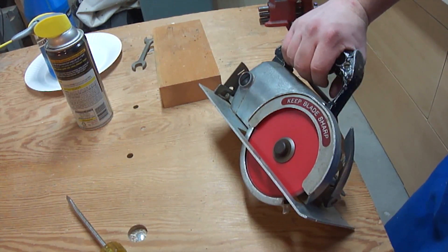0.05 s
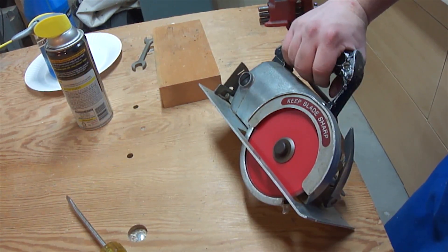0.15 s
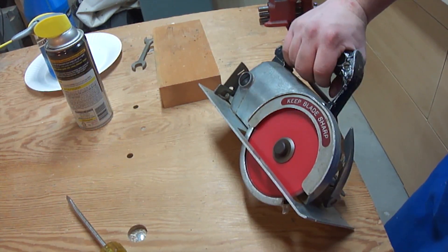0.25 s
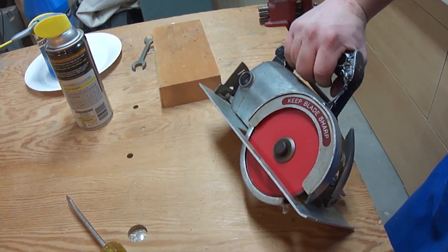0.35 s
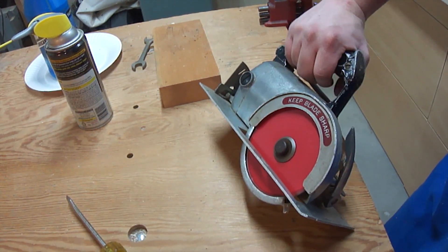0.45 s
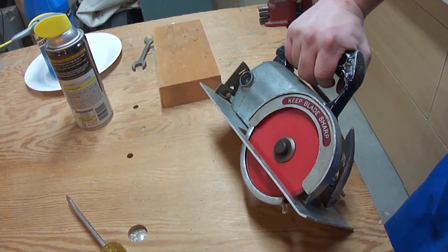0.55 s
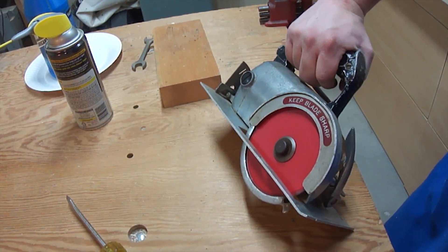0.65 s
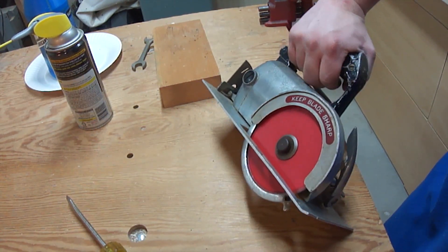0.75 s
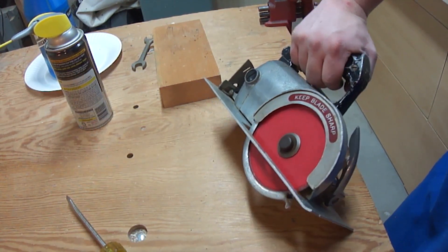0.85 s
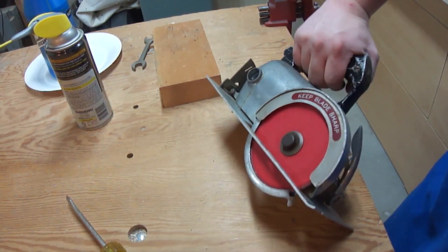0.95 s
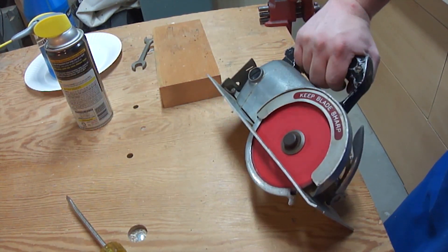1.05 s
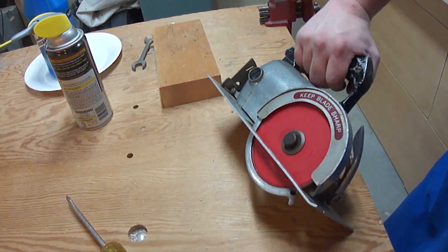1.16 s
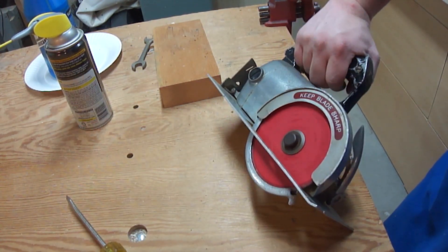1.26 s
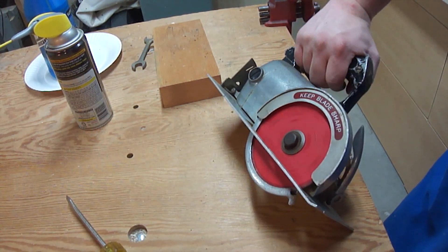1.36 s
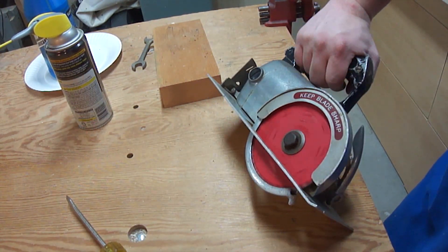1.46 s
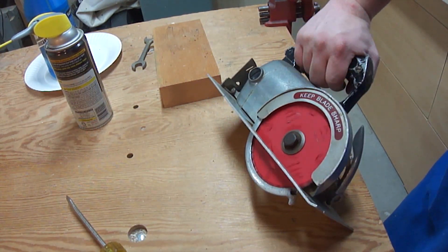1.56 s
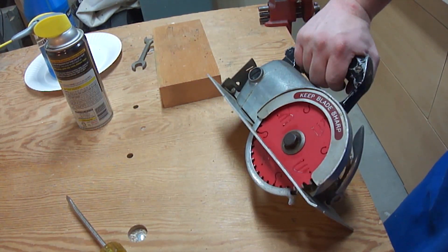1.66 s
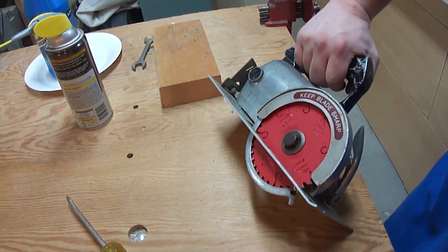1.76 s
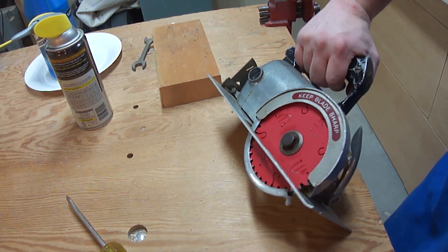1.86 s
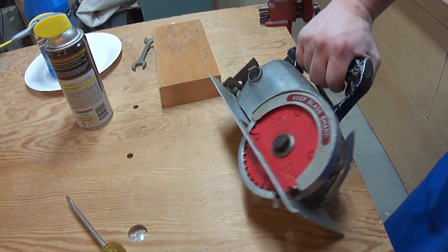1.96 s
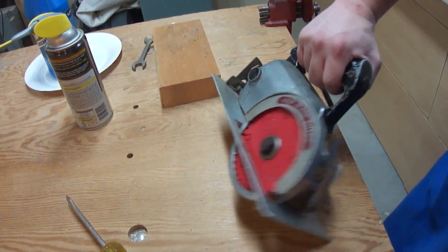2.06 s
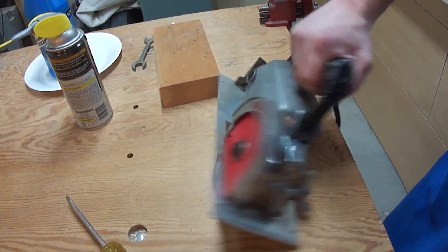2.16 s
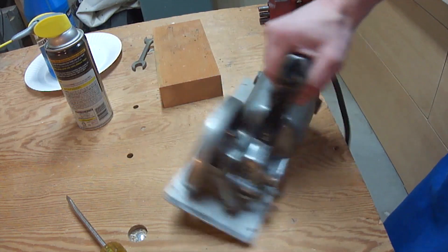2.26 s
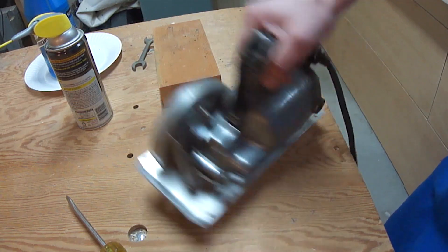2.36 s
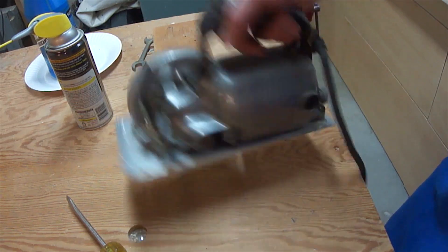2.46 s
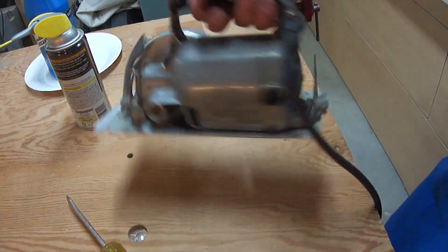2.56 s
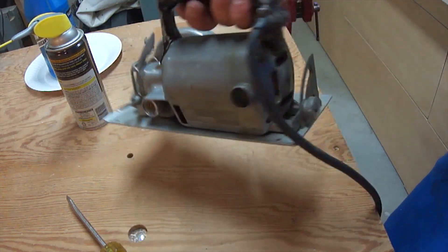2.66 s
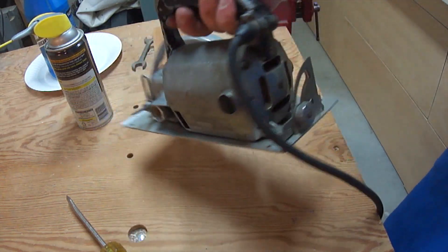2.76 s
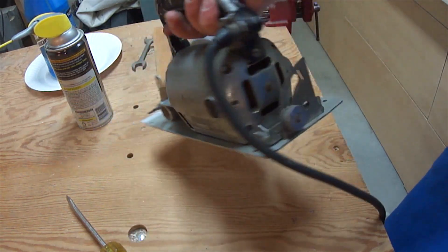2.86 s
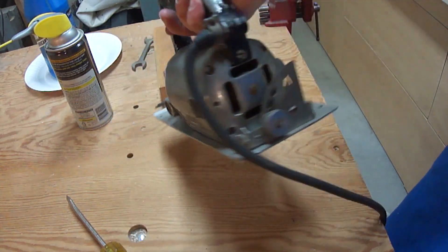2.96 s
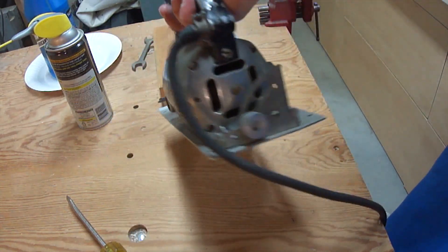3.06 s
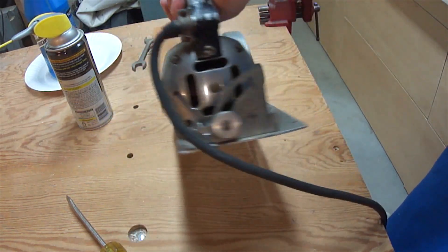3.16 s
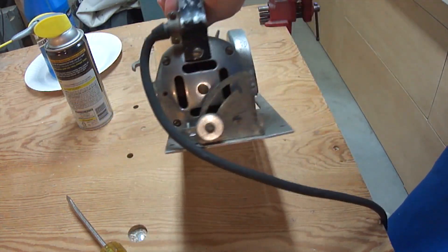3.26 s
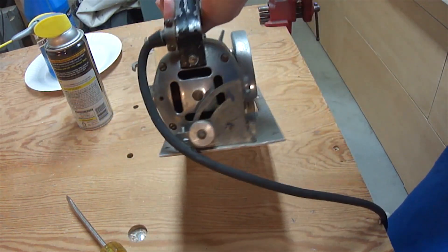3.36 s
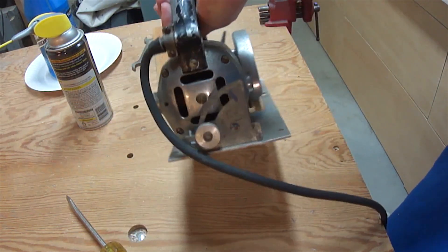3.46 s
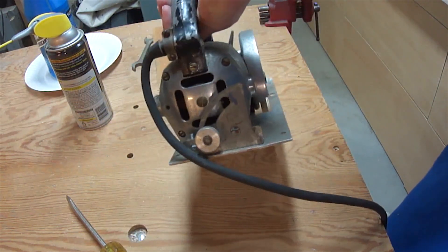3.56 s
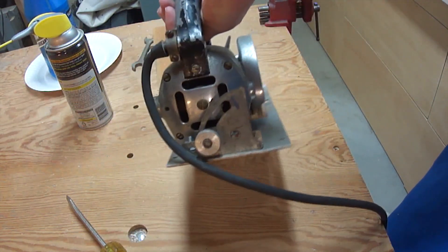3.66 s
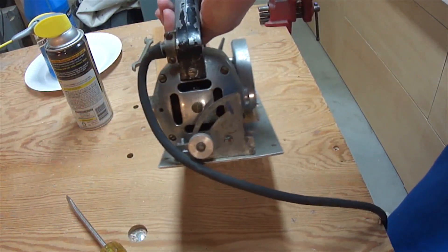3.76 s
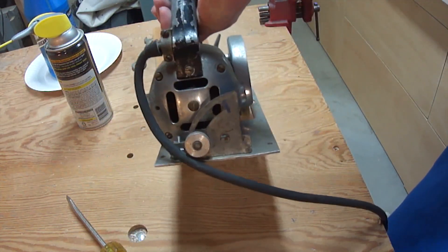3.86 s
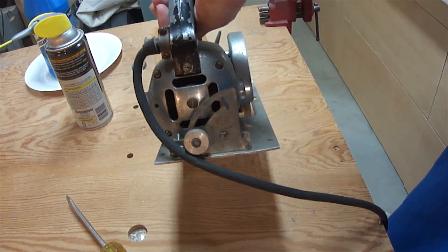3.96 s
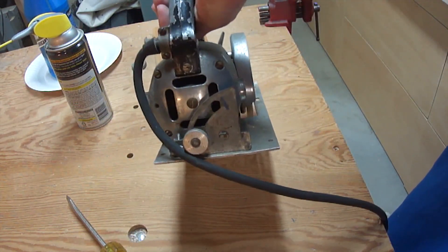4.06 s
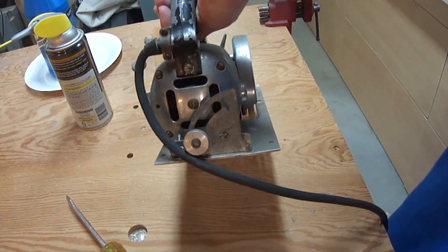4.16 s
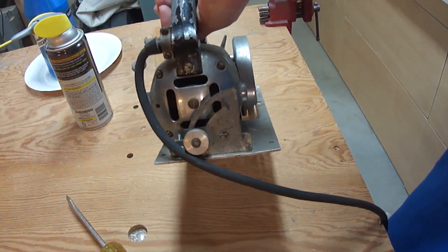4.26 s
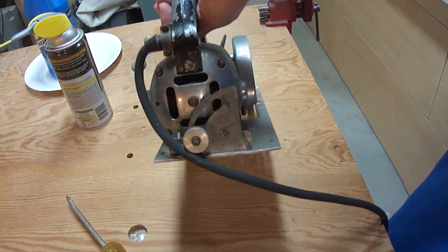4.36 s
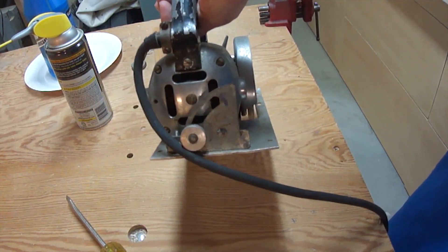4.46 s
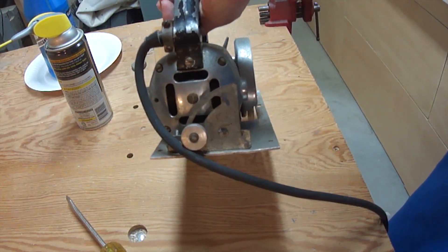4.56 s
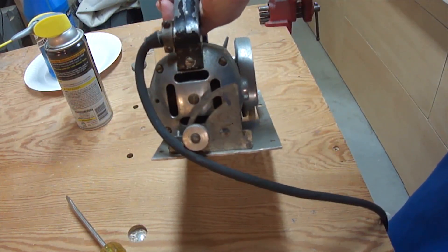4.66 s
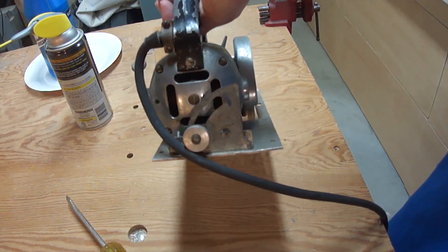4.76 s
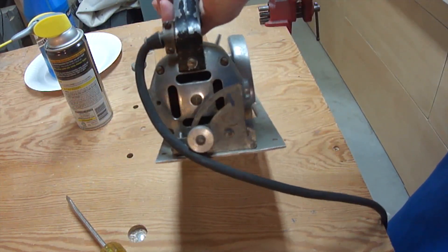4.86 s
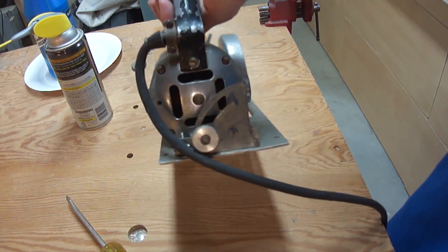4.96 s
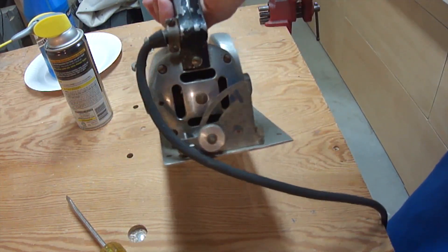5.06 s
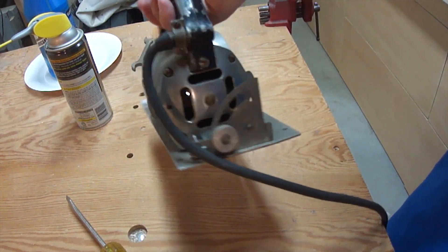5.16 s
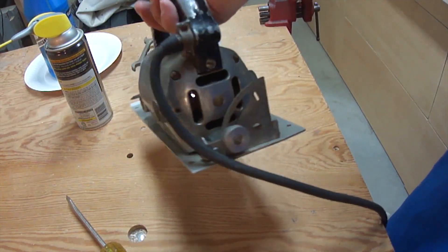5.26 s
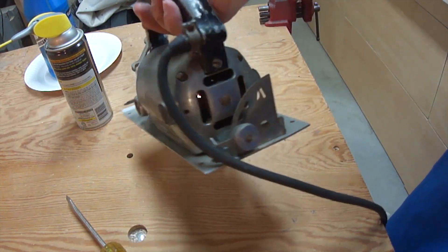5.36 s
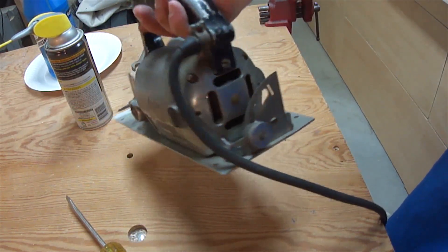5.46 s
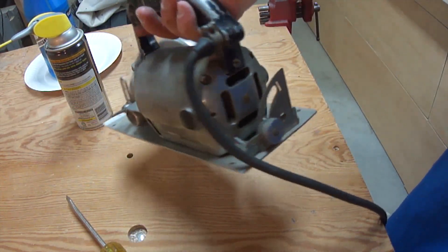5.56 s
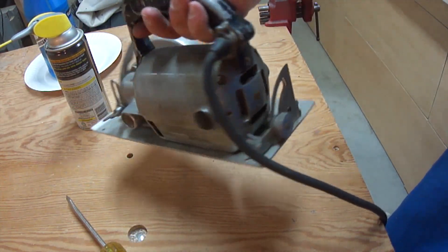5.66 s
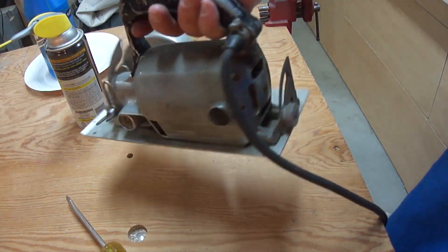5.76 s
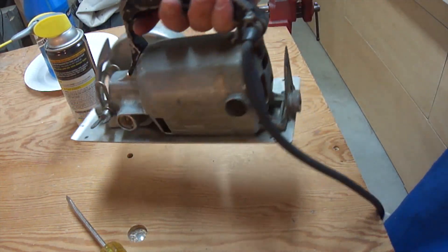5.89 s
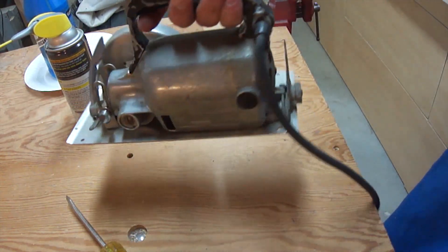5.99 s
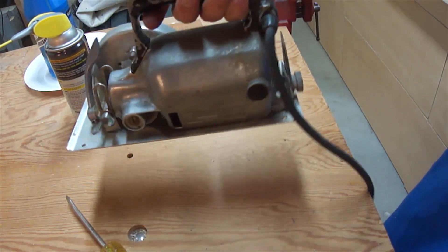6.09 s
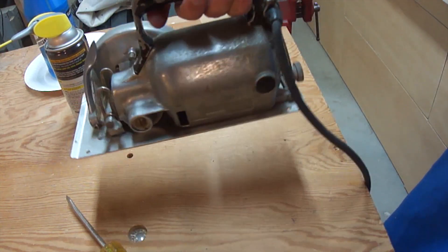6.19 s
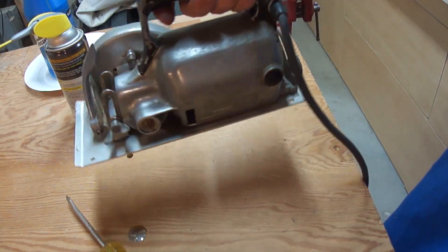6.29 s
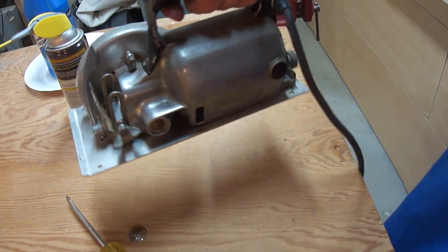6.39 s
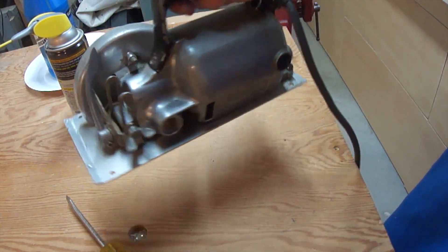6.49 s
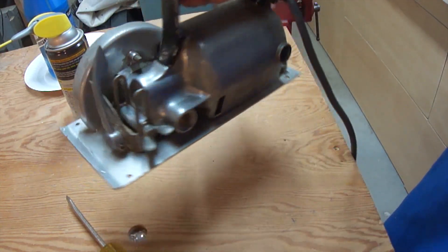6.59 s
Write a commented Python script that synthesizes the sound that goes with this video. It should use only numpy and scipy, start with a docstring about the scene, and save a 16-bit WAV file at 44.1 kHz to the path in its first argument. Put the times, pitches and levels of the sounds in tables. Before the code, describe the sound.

A handheld circular saw's motor whirs down to a stop, scrapes and knocks on a wooden bench, then clicks on and whines up to full speed.

```python
"""A corded trim saw's motor coasts to a stop, then later whines up to full speed: eight pulses a rotor turn
beamed in lobes, with gear rattle, brush rasp and fan air, changing in colour as the saw is swung round.
While the motor is off, filtered grit drags the shoe over a wooden bench, decaying modes and noise knock on it,
the blade guard chatters and noise bursts click the trigger. Diffuse reflections and faint ventilation
place it all in a small workshop."""
import sys
import numpy as np
from scipy import signal
from scipy.fft import rfft, irfft
from scipy.io import wavfile
from scipy.ndimage import uniform_filter1d

SR = 44100
rng = np.random.default_rng(int(sys.argv[2]) if len(sys.argv) > 2 else 0)


def pcm_store(signal):
    """Save signal as 16-bit PCM."""
    levels = np.round(np.clip(np.atleast_2d(signal), -1, 1) * 32767)
    wavfile.write(sys.argv[1], SR, levels.astype(np.int16).T)


N = 292380
TIME = np.arange(N) / SR
SWITCH_ON_S, LIFT_S, END_S = 3.451, 4.9, 7
COAST_HZ = 162.27  # rotor turns per second at the start

# shoe blows and judders on the bench: start_s, peak_db, contact_hardness_hz
KNOCK_EVENTS = [(2.3243, -18.5, 2400), (2.331, -22.5, 900), (2.357, -28, 1270), (2.371, -31, 1290),
                (2.397, -29, 1300), (2.421, -32, 1310), (2.443, -36.5, 1000), (2.48, -47, 900)]


def undb(db):
    """Decibels to gain."""
    return 10 ** (np.asarray(db) / 20)


def unit(x):
    """Scale to rms 1."""
    return x / np.sqrt(np.mean(x ** 2))


def curves(rows):
    """Each column of a table, joined by straight lines in time."""
    s, *columns = np.transpose(rows)
    return [np.interp(TIME, s, c) for c in columns]


def between(start, end, fade=0.0031):
    """1 from start to end, with linear ramps inside; all in seconds."""
    return np.clip((TIME - start) / fade, 0, 1) * np.clip((end - TIME) / fade, 0, 1)


def colour(x, points):
    """Filter by a spectrum of (Hz, dB) points that falls away below the first."""
    hz, db = np.transpose(points)
    f = np.arange(N // 2 + 1) * SR / N + 1e-3  # offset avoids log(0)
    gain = undb(np.interp(np.log(f), np.log(hz), db))
    return irfft(rfft(x) * gain * np.minimum(f / hz[0], 1) ** 2, N)


def cut(x, hz, kind, order=2):
    """Butterworth low-pass or high-pass."""
    sos = signal.butter(order, min(hz, .45 * SR), kind, fs=SR, output="sos")
    return signal.sosfilt(sos, x + 1e-18)


def ring(x, hz, width):
    """One resonance of the given width in Hz, gain 1 at its centre."""
    return signal.lfilter(*signal.iirpeak(hz, hz / width, fs=SR), x)


def walk(rate):
    """Smooth random drift at about rate Hz, spread near 1."""
    k = max(int(SR / rate), 2)
    steps = np.repeat(rng.standard_normal(N // k + 1), k)[:N]
    return 1.88 * uniform_filter1d(steps, k)


def grit(rate, spread_db):
    """Tiny random contacts, rate per second, of very uneven size."""
    sizes = undb(spread_db * np.minimum(rng.exponential(size=N), 5))
    return unit((rng.random(N) < rate / SR) * sizes * rng.standard_normal(N))


def decay(t, t60):
    """Fall by 60 dB in t60 seconds."""
    return np.exp(-np.log(1000) * t / t60)


def add(track, s, sound, db):
    """Mix a short sound in at time s with the given peak level."""
    i = int(s * SR)
    track[i:i + len(sound)] += undb(db) * sound / np.abs(sound).max()


def rotor_speed():
    """Turns per second: dry friction and air drag stop the rotor; power adds a surge and a slow climb."""
    friction_hz_per_s, drag_s = 73.71, 3.963
    full_hz, surge_s, climb_s, surge_share = 335.02, .0943, .4812, .443
    friction_hz = friction_hz_per_s * drag_s
    coast = (COAST_HZ + friction_hz) * np.exp(-TIME / drag_s) - friction_hz
    on_s = np.maximum(TIME - SWITCH_ON_S, 0)
    shortfall = surge_share * np.exp(-on_s / surge_s) + (1 - surge_share) * np.exp(-on_s / climb_s)
    return np.maximum(coast, 0) + full_hz * np.maximum(1 - shortfall, 0)


def whine(angle, load):
    """Power on: eight pulses a turn sing as a siren; the uneven rotor adds lines at its other multiples."""
    # weaker rotor lines: rotor_multiple, relative_level_db
    rotor_lines = [(6, -60), (17, -54.5), (19, -66), (25, -61), (31, -62.5)]
    pulse_angle = 8 * angle
    siren = beamed(angle, load)
    # lines grow as load falls and speed rises
    lines = (1 - load) ** 2 * sum(undb(db + 2 * walk(6)) * np.sin(k * angle) for k, db in rotor_lines)
    # loaded teeth flare as their harmonics sweep through the gear case's resonances
    mesh = 12 * angle + .8 * walk(260)
    teeth = np.sin(mesh) + .8 * np.sin(2 * pulse_angle) + .35 * np.sin(3 * pulse_angle)
    teeth = load * teeth * undb(2 * walk(90))
    gears = undb(-28) * ring(teeth, 2700, 550) + undb(-29) * ring(teeth, 4700, 800)
    # teeth also whistle high up under strain
    high = cut(np.sin(4 * pulse_angle) + .4 * np.sin(5 * pulse_angle), 5500, "high")
    whistle = load * undb(-44 + 3 * walk(30)) * high
    # off the bench, the unbalanced body is free to hum once a turn
    hum = undb(-67.5) * np.sin(angle) * between(LIFT_S, END_S, fade=0.084)
    return np.sqrt(2) * (siren + lines + hum + gears + whistle) * between(3.49, END_S, fade=0.025)


def beamed(angle, load):
    """The whine's partials swell and vanish as their lobes swing past the microphone."""
    # saw held, then swung round: time_s, angle_deg, relative_level_db
    swing = [(3.55, 1, -0.5), (4, 12, 0), (4.6, 9.5, 4), (5, 9.5, 2.5), (5.5, 34, -2.5), (5.78, 66.5, -6),
             (5.9, 82.5, 3), (6.25, 97, 2), (6.6, 116.5, -4.5)]
    # beamed partials: rotor_multiple, relative_level_db, gap_depth (0-1), gap_angle_deg, gap_spacing_deg
    lobes = [(8, -33.5, 0.63, 68.3, 104), (9, -49, 1, 30, 360), (12, -52.5, 1, 93, 97),
             (16, -34, 1, 94.96, 91.2), (24, -51.5, 0.66, 21.7, 36.4), (32, -54.5, 1, 5.4, 93.6)]
    flicker_depth_db, load_flicker_depth_db, load_shake_rad = 1.0, 3.5, .12
    degrees, level_db = curves(swing)
    out = 0
    for k, db, depth, gap, spacing in lobes:
        lobe = np.abs(1 - depth * np.exp(2j * np.pi * (degrees - gap) / spacing))
        # strain deepens the wavering and lowers its mean
        flicker_db = flicker_depth_db * walk(12) + load_flicker_depth_db * load * (walk(70) - 1)
        shake = load_shake_rad * load ** 2 * walk(300)  # straining gears roughen the pitch
        out = out + lobe * undb(db + flicker_db) * np.sin(round(k) * (angle + shake))
    return radiated(out * undb(level_db))


def radiated(x):
    """The small body gives off almost nothing of a low tone."""
    return cut(x, 590, "high", order=6)  # corner set by the body's size


def air(angle, load):
    """The fan rushes through the vents; the brushes rasp and spark, with a larger share at high load."""
    # band levels ahead of the gains below: time_s, roar_db, rush_db, hiss_db
    band_levels = [(3.75, -44.5, -45, -45.5), (3.99, -43, -44, -46), (4.1, -44, -51.5, -57),
                   (4.13, -45, -49.5, -48), (4.7, -46, -47, -56.5), (4.76, -45, -44, -50),
                   (5.27, -44.5, -43.5, -51.5), (5.6, -48, -48.5, -49), (6.6, -47, -50, -48)]
    # vent spectrum: frequency_hz, gain_db
    vent_spectrum = [(150, -48), (330, -15), (480, -12), (680, 0), (930, -4), (1300, 2.5), (2200, 1.5),
                     (2900, -3), (3500, -5.5), (4600, -3), (6300, -7), (11000, -18.5)]
    roar_db, rush_db, hiss_db = curves(band_levels)
    sparks = grit(rate=5000, spread_db=3.5) * (1 + 0.18 * np.cos(angle))
    sparks = sparks + 0.31 * wear(angle + 0.0033 * walk(150))
    rasp = 0.17 + 1.4 * load
    flow = colour((rng.standard_normal(N) + rasp * sparks) / np.hypot(1, rasp), vent_spectrum)
    # three complementary bands, each with its own level curve
    low = cut(flow, 2200, "low", order=1)
    below_hiss = cut(flow, 6800, "low", order=1)
    roar = low * undb(roar_db + 5.0)
    rush = (below_hiss - low) * undb(rush_db + 10)
    hiss = (flow - below_hiss) * undb(hiss_db + 13.0)
    vents = (roar + rush + hiss) / flow.std() * undb(.5 * walk(25))
    shell = housing(sparks) * undb(rush_db + 5.0) * (0.13 + 1.7 * load)
    return (vents + shell) * between(SWITCH_ON_S, END_S) * undb(-6 * load ** 3)


def wear(angle, size=160):
    """The worn commutator's bumps, met again on every turn: a dense comb of rotor multiples."""
    around = np.arange(size) * 2 * np.pi / size
    return unit(np.interp(angle, around, rng.standard_normal(size), period=2 * np.pi))


def housing(x):
    """Ring the saw's metal housing and blade guard."""
    # shell modes: frequency_hz, width_hz, relative_level_db
    modes = [(254, 30, -18.5), (672, 28, -1), (1235, 61, 7), (2470, 230, 6), (2820, 64, 9.5),
             (3110, 66, -10), (5870, 170, -3.5)]
    return unit(sum(undb(db) * ring(x, hz, width) for hz, width, db in modes))


def coasting(angle, rotor_hz):
    """Power off: the tone sinks with a quick flutter while the brushes scratch round."""
    # gear and commutator lines: rotor_multiple, relative_level_db
    gear_lines = [(20.2, -4), (21, -6), (24, 0), (25, -5), (28.5, -6), (32, -2), (36, -5), (40, -3),
                  (44, -6)]
    # rubbing spectrum: frequency_hz, gain_db
    rub_spectrum = [(130, -18), (330, -11), (560, -1.5), (720, 3.5), (1000, -9.5), (1250, -5.5),
                    (1650, -10), (2700, -8), (4000, -8), (7000, -11), (11000, -22.5)]
    rub_exponent, rattle_exponent = 0.9, 0.79  # growth with speed
    speed = rotor_hz / COAST_HZ
    shaken_angle = angle + .004 * walk(70)
    pulse_angle = 8 * shaken_angle
    # tone sinks through a housing resonance, then out of the radiated range
    fundamental = np.sin(pulse_angle) * undb(2.0 + 1.94 * walk(44.73))
    tone = undb(-39.5) * (fundamental + 1.26 * ring(fundamental, 672, 67))
    octave = undb(-45.5) * ring(np.sin(2 * pulse_angle) * undb(2 * walk(40.3)), 1860, 760)
    # gear case favours lines passing through its middle range
    lines = sum(undb(db + 2 * walk(45.3)) * np.sin(k * shaken_angle) for k, db in gear_lines)
    lines = ring(lines, 2830, 600)
    # unbalanced rotor drones through the bench, fading early
    drone = undb(-58.5) * np.sin(angle) * between(-1, 0.52, fade=0.93)
    worn = cut(cut(wear(shaken_angle), 1500, "high"), 4500, "low")
    contacts = grit(rate=6000, spread_db=2.1) + .9 * worn
    rubbing = (unit(colour(contacts, rub_spectrum)) + undb(-5) * lines) * speed ** rub_exponent
    # housing rattle fades in over the first second
    rattle = undb(-12.5) * housing(contacts) + undb(-8) * unit(ring(contacts, 3090, 600))
    rattle = rattle * between(0, END_S, fade=1.0) * speed ** rattle_exponent
    friction = undb(-44) * (rubbing + rattle)
    # low shell hum just before the stop
    low_hum = undb(-74) * unit(ring(ring(contacts, 237, 14), 237, 15)) * between(1.1, END_S, fade=0.102)
    return (radiated(tone + octave) + drone + friction + low_hum) * between(-1, 1.737, fade=0.16)


def sliding():
    """The shoe scrapes over the wood grain and rings the housing; after the knock it brushes more lightly."""
    # shoe and cord strokes: start_s, length_s, body_db, hiss_db, end_swell_db
    strokes = [(1.941, 0.36, -47, -52, 15), (2.409, 0.32, -52.5, -56, 3), (2.784, 0.477, -66, -64, 5)]
    # scrape spectrum: frequency_hz, gain_db
    scrape_spectrum = [(130, -8), (280, -5.5), (400, 0.5), (780, 7), (1600, -1), (2900, -4), (3700, -13),
                       (6400, -16), (11000, -24.5)]
    fade_s, hiss_swell_ratio = 0.061, 1.83  # hiss swells more than body
    contacts = grit(rate=9000, spread_db=1.3) * undb(0.91 * walk(60))
    scrape = colour(contacts, scrape_spectrum)
    pressed = between(0, KNOCK_EVENTS[0][0], fade=0.056)
    # shoe plate sings faintly under the saw's weight
    plate = 0.29 * unit(ring(contacts, 1233, 41)) + .5 * housing(contacts)
    body = unit(cut(scrape, 5900, "low", order=4)) * (1 - .5 * pressed) + pressed * plate
    hiss = unit(cut(cut(scrape, 5000, "high", order=4), 8800, "low"))
    out = 0
    for s, length, body_db, hiss_db, swell_db in strokes:
        to_go = np.clip(1 - (TIME - s) / length, 0, 1)
        stroke = body * undb(body_db - swell_db * to_go)
        stroke = stroke + hiss * undb(hiss_db - hiss_swell_ratio * swell_db * to_go)
        out = out + stroke * between(s, s + length, fade=fade_s)
    # hand and cord rustle on between strokes
    rustle = undb(-69.5) * body + undb(-80) * hiss
    return out + rustle * between(strokes[0][0], SWITCH_ON_S)


def knocks():
    """Each blow cracks and rings the bench; softer contact weakens the high modes."""
    # bench-top modes: frequency_hz, relative_level_db, t60_s
    bench_modes = [(139, -17, 0.23), (300, -8, 0.12), (472, -7, 0.097), (355, -1.5, 0.087),
                   (408, -10, 0.07), (626, -1, 0.12), (685, -1, 0.2), (784, 1, 0.062), (1110, -6, 0.12),
                   (1378, -10, 0.12), (1550, -3, 0.069), (1900, -5, 0.023), (2400, -5, .04)]
    out, t = np.zeros(N), TIME[:SR // 3]
    for s, db, hard_hz in KNOCK_EVENTS:
        blow = rng.standard_normal(len(t)) * (undb(10.5) * decay(t, 0.029) + undb(1) * decay(t, 0.25))
        for k, (hz, mode_db, t60) in enumerate(bench_modes):
            mode_hz = hz * (1 + 0.016 * rng.standard_normal())
            blow += (-1) ** k * undb(mode_db) * decay(t, t60) * np.sin(2 * np.pi * mode_hz * t)
        add(out, s, cut(cut(blow, hard_hz, "low"), 196, "high", order=3), db)
    return out


def chatter():
    """Short bursts of quick metal contacts ring the guard."""
    # guard bursts: start_s, length_s, level_db
    bursts = [(2.641, 0.033, -43), (3.17, 0.028, -58)]
    shake = sum(undb(db) * between(s, s + length, fade=0.011) for s, length, db in bursts)
    contacts = cut(grit(rate=5000, spread_db=1.2), 4500, "low")
    return shake * unit(housing(contacts) + 1.1 * unit(ring(contacts, 1900, 1200)))


def trigger():
    """Dry switch clicks as decaying noise; the take-up leaves the spring ringing."""
    # take-up, then switch snap, before colouring: start_s, peak_db, t60_s
    clicks = [(3.3345, -35, 0.024), (3.4445, -35, .01), (3.4449, -12, 0.014)]
    # click spectrum: frequency_hz, gain_db
    click_spectrum = [(200, -11), (1000, -11), (2800, 2), (4500, 4), (6600, 2), (10500, -9)]
    out, t = np.zeros(N), TIME[:SR // 4]
    for s, db, t60 in clicks:
        add(out, s, rng.standard_normal(len(t)) * decay(t, t60), db)
    out = colour(out, click_spectrum)
    spring = np.sin(2 * np.pi * 3600 * t) + 0.63 * np.sin(2 * np.pi * 3760 * t)
    add(out, clicks[0][0], decay(t, 0.27) * spring, -59)
    return out


def room(x, t60=0.44):
    """Diffuse reflections from the bench and near walls, as convolution with decaying noise."""
    t = TIME[:SR // 2]
    tail = rng.standard_normal(len(t)) * decay(t, t60) * (t > .004)
    return signal.fftconvolve(x, tail / np.linalg.norm(tail))[:N]


def ventilation():
    """Faint steady shop ventilation as coloured noise."""
    # shop spectrum: frequency_hz, gain_db
    shop_spectrum = [(110, -18.5), (400, -1), (1000, -5.5), (3000, -13), (8000, -17.5), (11000, -24)]
    return undb(-68.5) * unit(colour(rng.standard_normal(N), shop_spectrum))


def scene():
    """One rotor drives all the motor's sounds; everything stands in the same quiet shop."""
    rotor_hz = rotor_speed() * (1 + 0.000263 * walk(12))
    angle = 2 * np.pi * np.cumsum(rotor_hz) / SR
    load = 1 - rotor_hz / rotor_hz.max()  # current and torque fall as the motor gathers speed
    tone = whine(angle, load)
    coast = coasting(angle, rotor_hz)
    handling = sliding() + knocks() + chatter() + trigger()
    reflections = room(undb(-16.5) * tone + undb(-4.5) * coast + undb(-8) * handling)
    return (tone + air(angle, load) + coast + handling + reflections + ventilation())[None]


def record(dry):
    """A low-rate recorder: no deep bass, a band that ends near 11 kHz, and its top mirrored faintly above."""
    recorder_hz, band_hz, top_hz = 24000, 11150, 15600
    band_filter = signal.ellip(12, .2, 70, band_hz, fs=SR, output="sos")
    band = signal.sosfilt(band_filter, cut(dry, 90, "high", order=2))
    top = signal.hilbert(cut(band, 11200, "high", order=6))
    # each frequency f reappears at recorder_hz - f
    mirror = np.real(np.conj(top) * np.exp(2j * np.pi * recorder_hz * TIME))
    top_filter = signal.ellip(10, .2, 70, top_hz, fs=SR, output="sos")
    return signal.sosfilt(top_filter, band + undb(-5.0) * mirror)


dry = scene()
out = record(dry)
pcm_store(out)
```